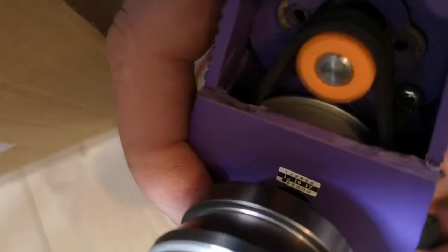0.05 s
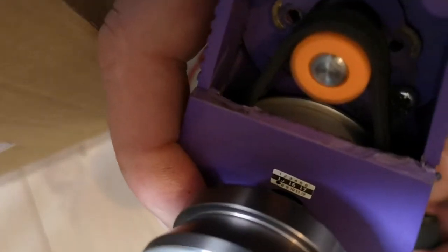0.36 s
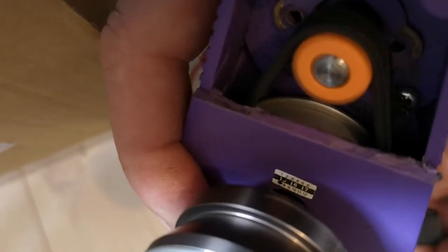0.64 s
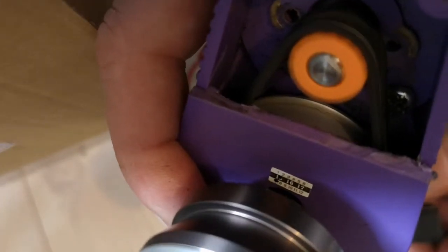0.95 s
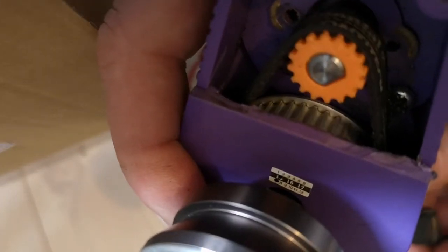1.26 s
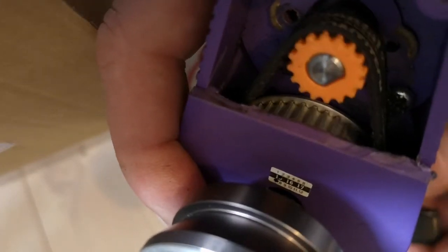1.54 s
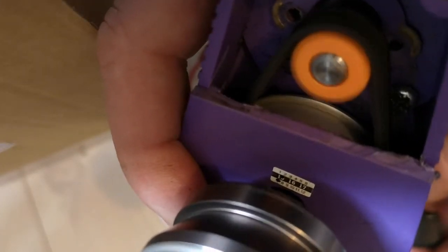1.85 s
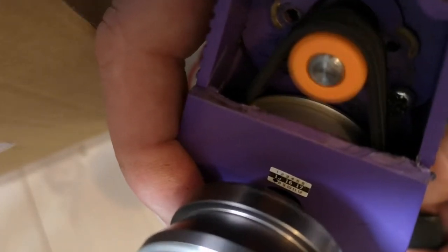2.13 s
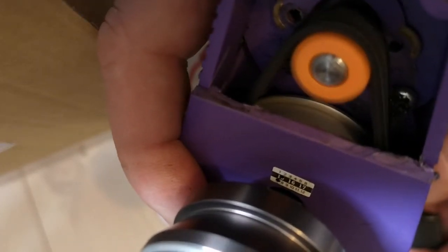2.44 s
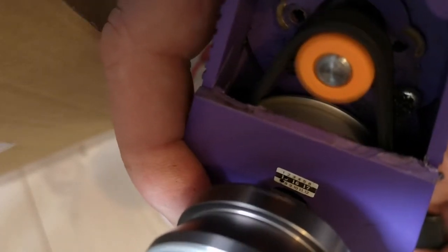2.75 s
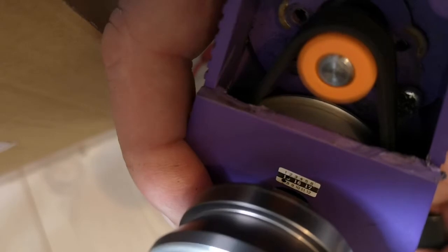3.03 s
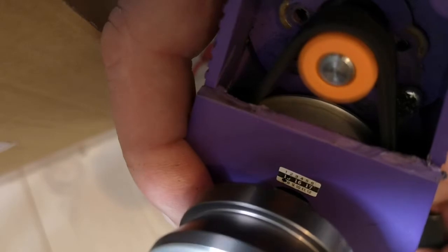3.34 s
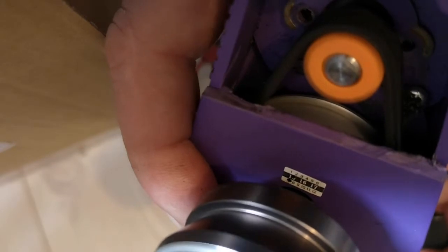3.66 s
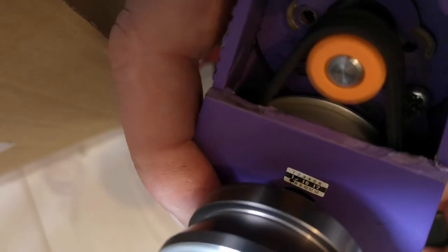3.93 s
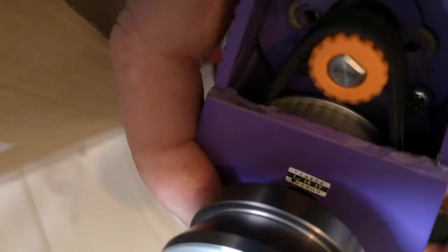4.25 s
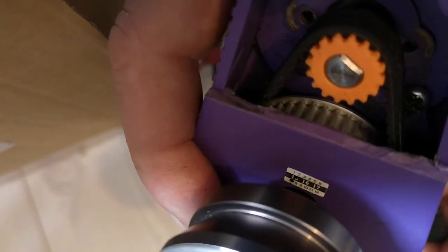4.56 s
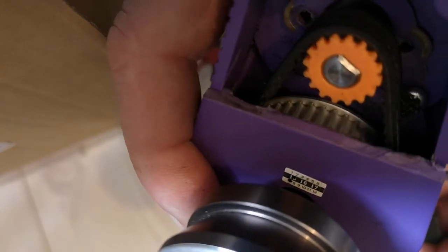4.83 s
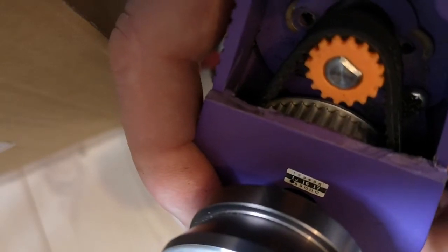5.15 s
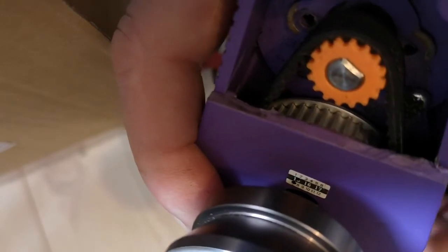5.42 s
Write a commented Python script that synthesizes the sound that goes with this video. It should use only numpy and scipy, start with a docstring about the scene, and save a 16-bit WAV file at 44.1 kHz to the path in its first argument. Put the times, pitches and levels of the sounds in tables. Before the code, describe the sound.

Close to the microphone and to the right, a small belt drive rattles at a workbench, each fast turn bringing a scuff and a sharp snap, often with a double slap. The motor cuts out after a second, pauses briefly, then clicks into a second run of over two seconds. Each abrupt stop leaves a faint metallic ring and a fading hiss in a quiet room.

```python
"""Toothed belt drive on a workbench

A small electric starter motor drives a toothed belt in a hand-held frame, in two short runs.
The meshing teeth make a dense rattle; each turn of the belt, six a second, brings a scuff, a few
ticks and a snap, often with a double slap. Every contact excites the modes of the frame, close by
and to the right. After each stop a faint ring and a hiss linger over the room's rumble."""
import sys
import numpy as np
from scipy import signal
from scipy.fft import rfft, irfft, next_fast_len
from scipy.io import wavfile

SR = 44100
rng = np.random.default_rng(int(sys.argv[2]) if len(sys.argv) > 2 else 0)


def generate_wav(sig):
    """Save sig (samples, or channels by samples) to the path in sys.argv[1] as 16-bit PCM at SR."""
    pcm = np.round(np.clip(np.atleast_2d(sig).T, -1, 1) * 32767).astype(np.int16)
    wavfile.write(sys.argv[1], SR, pcm)


N = 250915
TIME = np.arange(N) / SR

# runs of the motor: on_s, off_s, initial_level_db
MOTOR_RUNS = [(-.2, 0.998, -39), (1.867, 4.245, -35.5)]
# frame modes and their relative excitation: pitch_hz, bandwidth_hz, mesh_db, snap_db, slap_db
FRAME_MODES = [(201, 70, -5.5, -7.5, -2.5), (320.5, 93, -22, -19, -4), (361.5, 9.7, -3, -14, -8),
               (618.6, 13, -0.5, -22.5, -13), (688.5, 12, -4, -22, -13), (924, 33, -27, -20.5, -9),
               (1055.6, 28, 3, -16, -13.5), (1220, 170, -4.5, -30, -26.5), (1620, 65, 4.5, 5.5, 3.5),
               (1784, 150, 1, -14, -0.5), (2147, 55, 1.5, -11.5, -14.5), (2610, 68, -5.5, -11.5, 4.5),
               (2890, 275, -2, 0, 0.5), (3947, 336, -3.5, -4.5, -18), (4100, 100, -45, -29.5, -27.5),
               (5407, 253, -5, 4.5, -28.5), (6070, 250, -14.5, -26.5, -41.5),
               (6900, 1200, -16.5, -31.5, -33.5), (9400, 360, -24, -23, -38), (13300, 450, -32, -31, -43),
               (13430, 6400, -41.5, -30.5, -45.5)]
# one snap in each turn of the belt: start_s, relative_level_db
TURN_SNAPS = [(0.1497, -18.5), (.314, -23), (.484, -19.5), (.66, -14.5), (.827, -23), (1.0, -41.5),
              (2.03, -15), (2.193, -20.5), (2.3591, -19), (2.5261, -14.5), (2.694, -17.5), (2.861, -19.5),
              (3.029, -18.5), (3.1969, -15), (3.367, -16.5), (3.537, -20), (3.7054, -16), (3.872, -20),
              (4.0437, -21), (4.2157, -17.5)]
# light knocks as the belt starts or comes to rest: start_s, relative_level_db
SETTLING_KNOCKS = [(1.098, -55), (1.889, -31), (4.348, -43)]
# slaps of the slack belt around the harder snaps: start_s, relative_level_db
BELT_SLAPS = [(0.1395, -18), (.478, -26.5), (0.6498, -19), (2.020, -16), (2.187, -20), (2.5201, -16.5),
              (2.6881, -18), (3.0214, -19.5), (3.1909, -17), (3.526, -26), (3.699, -18), (4.2059, -19)]
# rough spots on the belt: offset_from_snap_s, level_over_drive_db
ROUGH_SPOTS = [(-.087, 7), (-.078, 7), (-.038, 10), (-.0295, 7), (-.02, 10), (.0465, 8)]
# ticks that stand out, several as the belt first bites: start_s, level_db
HARD_TICKS = [(1.938, -19), (1.9472, -20), (1.9887, -21), (2.006, -23), (2.906, -23.5), (2.990, -22),
              (3.243, -22), (3.449, -23), (3.919, -21.5)]
# partials of the tick as the drive takes up its slack: pitch_hz, level_db, t60_s
TAKE_UP_PARTIALS = [(1704, -57.5, 0.024), (3150, -40, .04), (4300, -47.5, 0.012), (6920, -52, 0.014)]
# acoustic shadow on the far side: frequency_hz, gain_db
FAR_SIDE_SHADOW = [(100, 6), (350, -3.5), (700, -10), (1300, -25), (1750, -28), (2400, -17), (3200, -10),
                   (4200, -24.5), (5500, -40), (8000, -24), (15000, -20)]
# spectrum of the lingering hiss: frequency_hz, relative_density_db
HISS_SPECTRUM = [(200, -21), (350, -2.5), (500, -8), (1200, -6.5), (1700, -4), (2700, -6.5), (3700, -11.5),
                 (5300, -13), (8000, -19), (16000, -29.5)]
# spectrum of the low rumble: frequency_hz, relative_density_db
RUMBLE_SPECTRUM = [(8, -14), (15, 15), (22, 3.5), (31, -8), (45, -4), (75, -3), (100, -16), (150, -12),
                   (200, -20), (300, -30), (500, -52.5), (1500, -79.5)]

SPIN_UP_S, SAG_DB_PER_S, BRAKE_DB_PER_S = .085, 2.0, 299.5
TURN_S, SCUFF_LEAD_S = .168, .0885
NEUTRAL_SNAP_DB, EDGE_DB_PER_DB = -16, 1.5   # snaps above the neutral level gain extra treble
REBOUND_S, REBOUND_DB = .0156, -1
SPOT_JITTER_S, SPOT_SPREAD_DB = .0008, 2.5
ROOM_T60_S, ROOM_DB = .15, -16
FAR_EAR_LAG_S, CUTOFF_HZ = .00059, 16200


def rattle(mesh_modes_db, tick_modes_db, places=6):
    """Random excitation: tooth impacts, rubbing and bright ticks drive the frame at several places."""
    force = belt_force(swell_db=1.7)
    tick_band = signal.butter(1, [3000, 13000], "band", fs=SR)
    out = 0
    for _ in range(places):
        teeth = from_db(-7) * contacts(per_s=120, spread_db=5)
        rubbing = from_db(-12.5) * rng.standard_normal(N)
        ticks = signal.lfilter(*tick_band, contacts(per_s=25, spread_db=2.5))
        body = struck_frame(force * (teeth + rubbing), mesh_modes_db, scatter_db=1)
        edge = struck_frame(force * ticks, tick_modes_db, scatter_db=2.5)
        out = out + propagate(body + from_db(-17) * edge)
    return out


def contacts(per_s, spread_db):
    """A Poisson process: independent impacts of uneven size, scaled to rms 1."""
    sizes = from_db(spread_db * np.minimum(rng.exponential(1, N), 3)) * rng.choice([-1, 1], N)
    return rms_one(sizes * (rng.random(N) < per_s / SR))


def belt_force(swell_db):
    """Tension modulates contact force: the belt tightens at each snap and half-way between."""
    snap_s = np.array(TURN_SNAPS)[:, 0]
    nearest_s = snap_s[np.searchsorted((snap_s[1:] + snap_s[:-1]) / 2, TIME)]
    tightness = np.cos(2 * np.pi * (TIME - nearest_s) / TURN_S) ** 6
    return drive_gain(TIME) * from_db(swell_db * tightness)


def drive_gain(t, fall_db_per_s=BRAKE_DB_PER_S):
    """The drive's envelope: a linear rise, a slow sag, then exponential decay after switch-off."""
    on_s, off_s, initial_db = np.transpose(MOTOR_RUNS)
    t = np.asarray(t)[..., None]
    spin_up = np.clip((t - on_s) / SPIN_UP_S, 0, 1)
    sag_db = SAG_DB_PER_S * (np.clip(t, on_s, off_s) - on_s)
    fall_db = fall_db_per_s * np.maximum(t - off_s, 0)
    return np.sum(spin_up * from_db(np.maximum(initial_db - sag_db - fall_db, -200)), axis=-1)


def each_turn(offsets_s):
    """Periodic motion: the times at which places on the belt come round, as turns x places."""
    return np.array(TURN_SNAPS)[:, :1] + offsets_s


def snaps(modes_db, gain_db):
    """Impulse excitation: a tooth drops into its groove or the belt settles; harder is brighter."""
    start_s, db = np.transpose(TURN_SNAPS + SETTLING_KNOCKS)
    plain = clicks(start_s, from_db(db))
    bright = clicks(start_s, from_db(db + EDGE_DB_PER_DB * (db - NEUTRAL_SNAP_DB)))
    # the plain impulse sets the bass, the bright one the treble
    force = bright + signal.lfilter(*signal.butter(1, 3000, fs=SR), plain - bright)
    ring = frame_ring(from_db(modes_db), damping=1.25, rise_s=.000035)
    return -from_db(gain_db) * convolve(force, ring)


def slaps(modes_db, edge_modes_db, gain_db, edge_db):
    """Soft impact and rebound: the slack belt lands twice, with a thump and a tick from its edge."""
    start_s, db = np.transpose(BELT_SLAPS)
    landing = clicks(start_s, from_db(db + gain_db))
    rebound = clicks(start_s + REBOUND_S, from_db(db + gain_db + REBOUND_DB))
    signs = (-1) ** np.arange(len(FRAME_MODES))
    thump = frame_ring(signs * from_db(modes_db), damping=1.73, rise_s=.00017)
    tick = high_pass(frame_ring(from_db(edge_modes_db), damping=.76, rise_s=.00002), 8000)
    return convolve(landing + rebound, thump + from_db(edge_db) * tick)


def scuffs(modes_db, gain_db, slip_gap_s, fade_db, rasp_db, chirp_hz, chirp_width_hz, chirp_db, count=7):
    """Stick-slip friction: the belt's edge rasps and chirps on the pulley half a turn before a snap."""
    start_s = each_turn(-SCUFF_LEAD_S)
    chance = rng.uniform(-.9, 1, (len(start_s), 2, count))
    gaps_s = slip_gap_s * (1 + .36 * chance[:, 0])
    slip_s = start_s + np.cumsum(gaps_s, axis=1) - gaps_s[:, :1]
    swell_db = -fade_db * np.abs(np.arange(count) - 2)   # peaks at the third slip
    heights = drive_gain(start_s) * from_db(gain_db + swell_db + 2 * chance[:, 1])
    slips = clicks(slip_s.ravel(), heights.ravel())
    sliding = convolve(slips, np.exp(-TIME[:SR // 20] / .003))
    force = slips + from_db(rasp_db) * sliding * rng.standard_normal(N)
    chirp = signal.lfilter(*signal.iirpeak(chirp_hz, chirp_hz / chirp_width_hz, fs=SR), force)
    return struck_frame(force, modes_db, scatter_db=.5) + from_db(chirp_db) * chirp


def spot_ticks(modes_db, low_cut_hz, damping):
    """Brief contacts are rich in treble: rough spots tick on the pulley, and a few catch hard."""
    offset_s, db = np.transpose(ROUGH_SPOTS)
    chance = rng.standard_normal((len(TURN_SNAPS), 2, len(db)))
    start_s = each_turn(offset_s) + SPOT_JITTER_S * chance[:, 0]
    heights = drive_gain(start_s) * from_db(db + SPOT_SPREAD_DB * np.clip(chance[:, 1], -2, 2))
    hard_s, hard_db = np.transpose(HARD_TICKS)
    force = clicks(start_s.ravel(), heights.ravel()) + clicks(hard_s, from_db(hard_db))
    ring = high_pass(frame_ring(from_db(modes_db), damping, rise_s=.00002), low_cut_hz)
    return convolve(force, ring / np.abs(ring).max())


def take_up():
    """Damped free vibration: a light metallic tick as the drive engages for its second run."""
    t = np.maximum(TIME - MOTOR_RUNS[1][0], 0)
    return sum(from_db(db - 60 * np.minimum(t / t60_s, 4)) * np.sin(2 * np.pi * hz * t)
               for hz, db, t60_s in TAKE_UP_PARTIALS)


def struck_frame(force, modes_db, scatter_db):
    """Mode shapes: each point of contact excites the modes with its own strengths and signs."""
    strengths = from_db(modes_db + scatter_db * rng.standard_normal(len(FRAME_MODES)))
    signs = rng.choice([-1, 1], len(FRAME_MODES))
    return convolve(force, unit_energy(frame_ring(signs * strengths, damping=1, rise_s=.00002)))


def frame_ring(strengths, damping, rise_s):
    """Modal superposition: the frame's impulse response, peak 1, builds more slowly for soft contact."""
    t = TIME[:SR // 8]
    pitch_hz, bandwidth_hz = np.array(FRAME_MODES).T[:2, :, None]
    width_hz = bandwidth_hz * damping
    modes = strengths[:, None] * width_hz * np.exp(-np.pi * width_hz * t) * np.sin(2 * np.pi * pitch_hz * t)
    onset = 1 - np.exp(-(t / rise_s) ** 2)
    ring = high_pass(modes.sum(0) * onset, 600)   # a small frame radiates little bass
    # a shallow antiresonance lies between two families of modes
    ring = .55 * signal.lfilter(*signal.iirnotch(8300, 3, fs=SR), ring) + .45 * ring
    return ring / np.abs(ring).max()


def after_ring(x, t60_s, gain_db):
    """Light damping: a dense cluster of metal modes rings on diffusely after the belt stops."""
    t = TIME[:2 * SR]
    band = signal.butter(2, [1380, 2000], "band", fs=SR, output="sos")
    rings = signal.sosfilt(band, rng.standard_normal((2, len(t)))) * from_db(-60 * t / t60_s)
    return from_db(gain_db) * np.array([convolve(x, unit_energy(ring)) for ring in rings])


def propagate(x):
    """Path difference and shadowing: sound from the right reaches the left later and duller."""
    left = np.interp(TIME - FAR_EAR_LAG_S, TIME, colour(x, FAR_SIDE_SHADOW))
    return np.array([left, x]) + room(x, early_decay_s=.0024, late_db=-31.5)


def room(x, early_decay_s, late_db):
    """Reverberation: quick reflections from bench and hands, then a weak tail, unlike on each side."""
    t = TIME[:SR // 2]
    decay = (np.exp(-t / early_decay_s) + from_db(late_db - 60 * t / ROOM_T60_S)) * (t > .001)
    echoes = rng.standard_normal((2, len(t))) * decay
    return from_db(ROOM_DB) * np.array([convolve(x, unit_energy(side)) for side in echoes])


def background(spectrum, floor_db, drive_db, fall_db_per_s, side_db):
    """Noise powers add: a steady floor, plus a part that rises with the drive and lingers after it."""
    mid, side = rms_one(colour(rng.standard_normal((2, N)), spectrum))
    gain = np.hypot(from_db(floor_db), from_db(drive_db) * drive_gain(TIME, fall_db_per_s))
    return gain * (mid + from_db(side_db) * side * np.array([[1], [-1]]))


def from_db(db):
    """Decibels to amplitude ratio."""
    return 10 ** (np.asarray(db) / 20)


def rms_one(x):
    """Scale to rms 1."""
    return x / np.sqrt(np.mean(x ** 2) + 1e-20)


def unit_energy(response):
    """A response of energy 1 preserves the power of white noise."""
    return response / np.sqrt(np.sum(response ** 2))


def high_pass(x, corner_hz):
    """First-order filter: 6 dB less for each octave below the corner."""
    return signal.lfilter(*signal.butter(1, corner_hz, "high", fs=SR), x)


def colour(x, points):
    """Zero-phase filtering by a curve of (frequency_hz, gain_db) points."""
    hz, db = np.transpose(points)
    size = next_fast_len(N + SR // 10)
    bins_hz = np.maximum(np.arange(size // 2 + 1) * SR / size, 1)
    gain = from_db(np.interp(np.log(bins_hz), np.log(hz), db))
    return irfft(rfft(x, size) * gain, size)[..., :N]


def convolve(x, response):
    """The output of a linear system with this impulse response."""
    return signal.fftconvolve(x, response)[:N]


def clicks(times_s, heights):
    """Each contact idealised as one impulse."""
    out = np.zeros(N)
    np.add.at(out, np.clip((np.asarray(times_s) * SR).astype(int), 0, N - 1), heights)
    return out


def scene():
    """Superposition of the belt's contacts, the after-ring, the hiss and the rumble."""
    mesh_db, snap_db, slap_db = np.array(FRAME_MODES).T[2:]
    drive = rattle(mesh_db, snap_db)
    drive += propagate(take_up())
    drive += propagate(spot_ticks(snap_db, low_cut_hz=7000, damping=.8))
    drive += propagate(scuffs(mesh_db, gain_db=22.5, slip_gap_s=.0028, fade_db=2.6, rasp_db=-22,
                              chirp_hz=2200, chirp_width_hz=260, chirp_db=17))
    drive += propagate(snaps(snap_db, gain_db=7))
    drive += propagate(slaps(slap_db, snap_db, gain_db=5, edge_db=-10.5))
    ringing = after_ring(drive[1], t60_s=2.2, gain_db=-45)
    hiss = background(HISS_SPECTRUM, floor_db=-82, drive_db=-34.5, fall_db_per_s=8.5, side_db=1)
    rumble = background(RUMBLE_SPECTRUM, floor_db=-60.5, drive_db=-16, fall_db_per_s=24.5, side_db=-16)
    return drive + ringing + hiss + rumble


def record(dry):
    """Band limiting: a steep low-pass filter removes the highest treble."""
    return signal.sosfilt(signal.ellip(10, .1, 80, CUTOFF_HZ, fs=SR, output="sos"), dry)


dry = scene()
out = record(dry)
generate_wav(out)
```